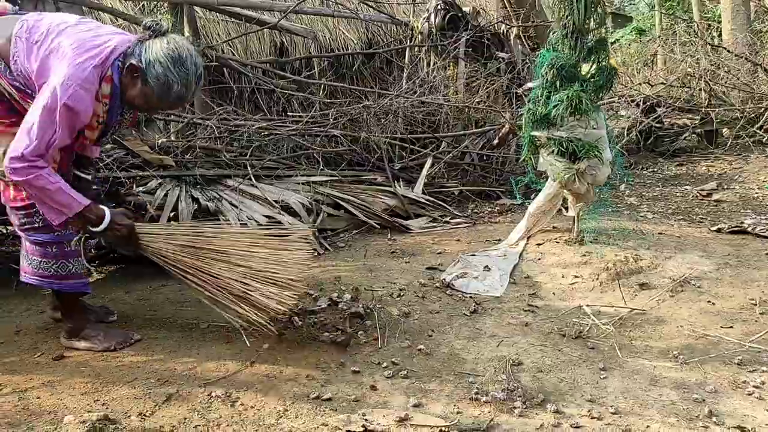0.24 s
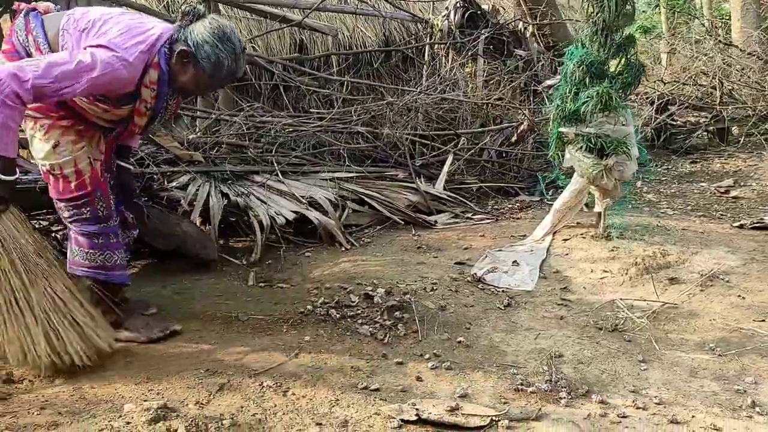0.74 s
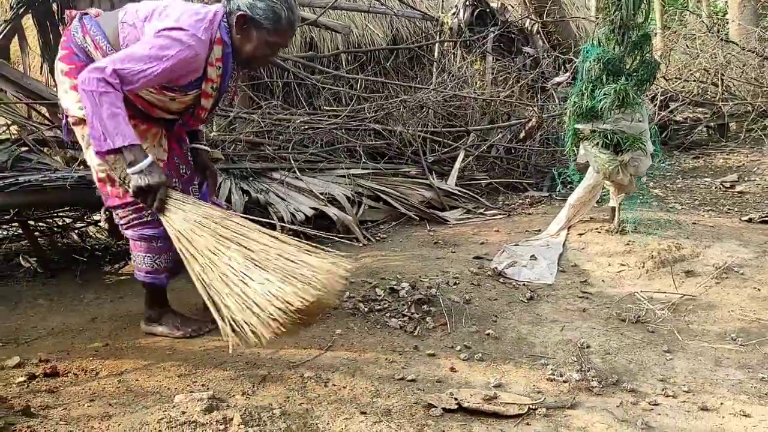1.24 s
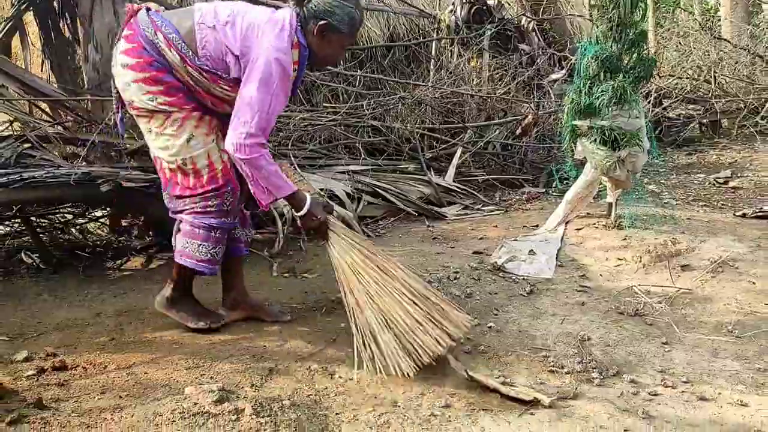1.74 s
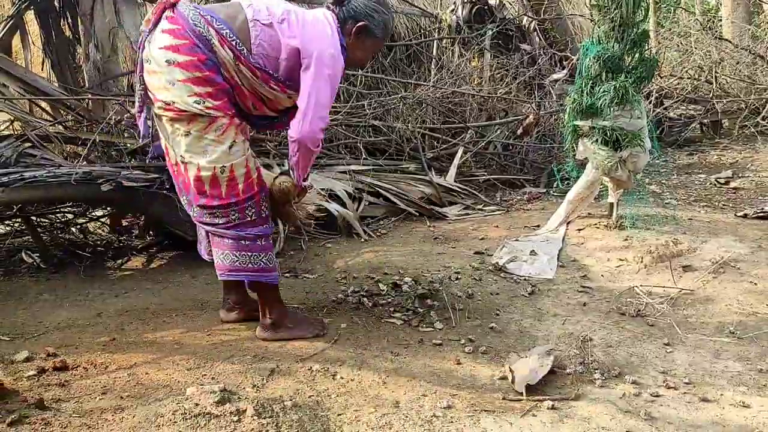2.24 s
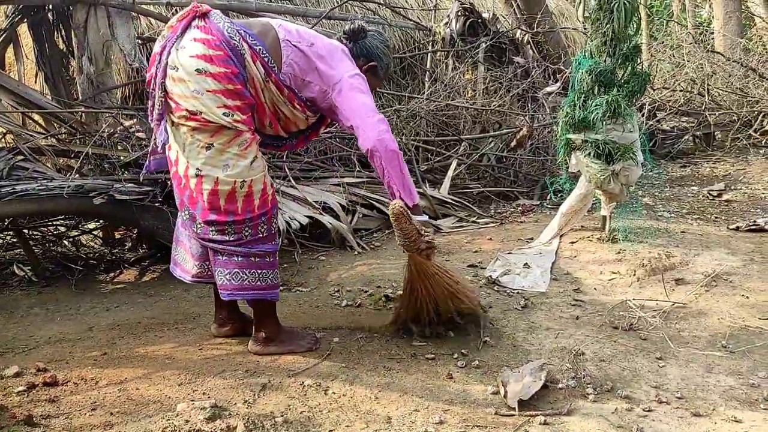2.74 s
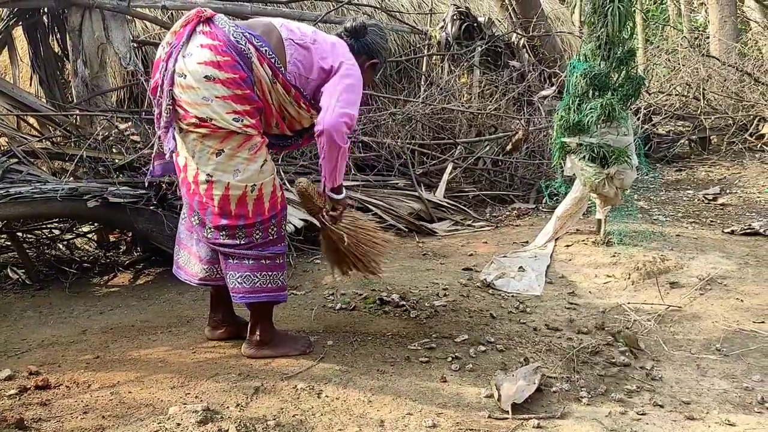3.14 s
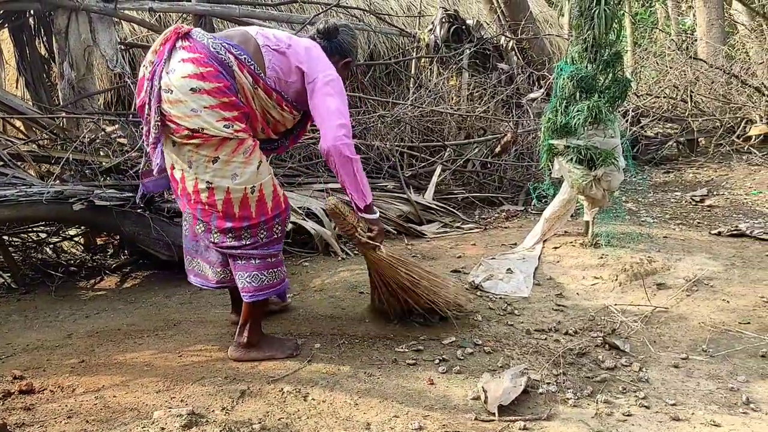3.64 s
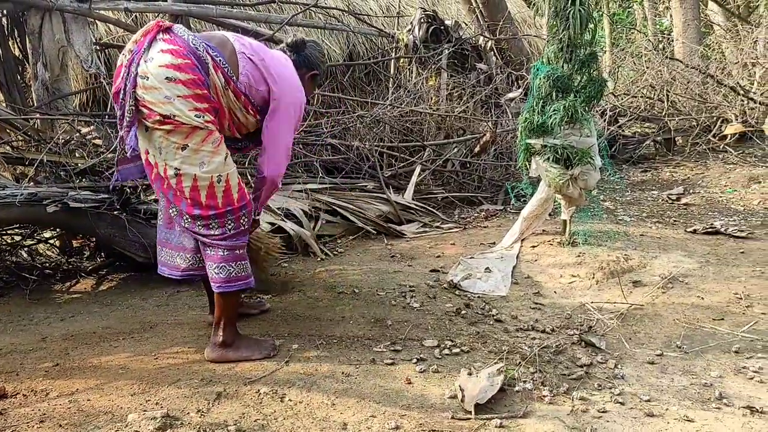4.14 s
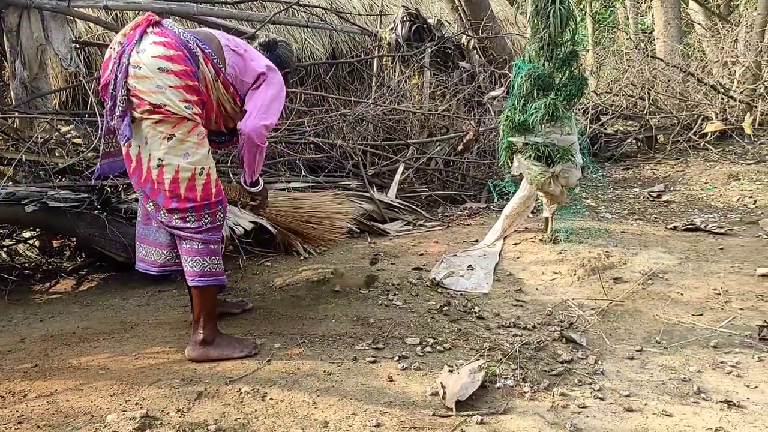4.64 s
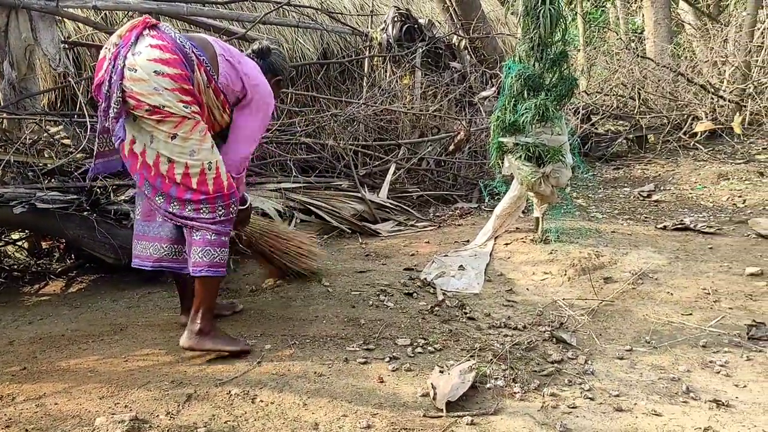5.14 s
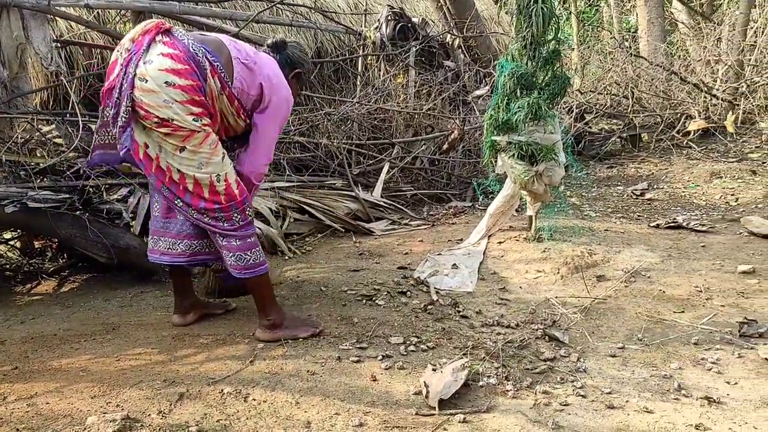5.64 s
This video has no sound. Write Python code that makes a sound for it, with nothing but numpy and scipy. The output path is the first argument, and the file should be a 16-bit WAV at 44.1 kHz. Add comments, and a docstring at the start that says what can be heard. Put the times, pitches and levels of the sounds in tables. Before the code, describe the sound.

Crisp, gritty broom sweeps on earth, with snapping straws and faint bird calls, overlapped by hoarse fluttering rooster crows halfway through.

```python
"""A stiff straw broom scrapes bare dirt in short strokes, a few metres from two microphone ports: coloured random clicks.
Pebbles and snapping straws are decaying noise bursts; a dry husk knocks as a low damped ring under a puff.
Two roosters crow over each other, as fluttering sums of partials; a far hen and a small bird are wavering tones.
Scattered echoes follow, over a yard of shaped noise: a steady low rumble and hiss that drifts in patches."""
import sys
import numpy as np
from scipy import signal
from scipy.fft import rfft, irfft
from scipy.io import wavfile
from scipy.ndimage import uniform_filter1d

SR = 44100
rng = np.random.default_rng(int(sys.argv[2]) if len(sys.argv) > 2 else 0)


def waveform_to_disk(signal):
    """Save audio, clipped to [-1, 1], as 16-bit WAV at the path in sys.argv[1]."""
    frames = np.transpose(np.atleast_2d(signal))
    scaled = np.clip(frames, -1, 1) * 32767
    samples = np.round(scaled).astype(np.int16)
    wavfile.write(sys.argv[1], SR, samples)


def natural_amplitude(level_db):
    """Convert a level in decibels to a linear amplitude factor, elementwise."""
    exponent = np.asarray(level_db, float) / 20
    return 10 ** exponent


N = 260005

# left_right_db is the level of the left port over the right throughout
# spectral density of the yard air, relative: hz, density_db
YARD_SPECTRUM = [(12, -8), (20, 10), (113, -3.5), (551, -11), (770, -15), (1590, -16), (2280, -17.5),
                 (3870, -17), (4840, -20), (7150, -19), (8450, -7), (9190, -13), (10600, -42), (14300, -64),
                 (15600, -98)]
YARD_DB = -63.5  # rms of the mean of both ports
# likeness of the yard air at the two ports: hz, correlation (-1 to 1)
YARD_LIKENESS = [(60, 0.37), (240, 0.08), (950, 0.16), (3770, 0.04), (15000, -0.27)]
# one far call a row: start_s, length_s, first_pitch_hz, last_pitch_hz, level_db
FAR_CALLS = [(1.197, 0.066, 2360, 2120, -60.5), (2.23, 0.2, 1144, 1085, -66.5),
             (2.38, 0.093, 1090, 1200, -62.5), (2.5, 0.06, 1270, 1200, -66), (3.07, 0.071, 1186, 1139, -52),
             (3.19, 0.068, 1264, 1150, -57.5), (3.56, .05, 1230, 1170, -57),
             (3.64, 0.058, 1200, 1150, -51.5), (4.5, 0.16, 1144, 1017, -53)]
FAR_OCTAVE_DB, FAR_OCTAVE_TOP_HZ = 1, 3200  # octave against fundamental; it dies away above this
# one syllable an entry: (third_over_second_partial_db, flutter (0-1), left_right_db),
# then its contour in rows: time_s, pitch_hz, fundamental_db, second_partial_db
CROW_SYLLABLES = [((-22, 0.39, 3), [(3.41, 595, -68, -59), (3.444, 682, -46, -53.5), (3.464, 747, -46, -56),
                  (3.512, 733, -47, -58), (3.55, 763, -75, -58)]), ((-21, 0.47, 3.8),
                  [(3.7, 680, -41.5, -45), (3.728, 896, -42.5, -55), (3.766, 914, -45, -53.5),
                  (3.792, 792, -39, -58), (3.82, 890, -67, -73)]), ((-7.5, 0.11, 3.2),
                  [(3.89, 684, -54, -46), (3.916, 696, -41, -55.5), (3.97, 710, -40, -62),
                  (3.986, 680, -45, -60), (4.0, 640, -79.5, -55)]), ((5.2, .3, 3.4),
                  [(3.99, 654, -62, -47.5), (4.005, 643, -58, -56.5), (4.015, 694, -45.5, -62),
                  (4.056, 711, -42.5, -69), (4.118, 747, -39.5, -58.5), (4.125, 714, -44, -76)]),
                  ((-13, 0.47, 0.65), [(4.12, 794, -48, -59), (4.146, 829, -40, -57.5),
                  (4.21, 824, -43.5, -58.5), (4.234, 859, -42, -54.5), (4.288, 775, -42, -63),
                  (4.34, 783, -62, -71)]), ((-1.5, 0.43, 0), [(4.16, 744, -61, -75), (4.184, 708, -41, -65),
                  (4.2, 708, -50, -66.5), (4.322, 692, -43.5, -52), (4.34, 670, -75, -64)]),
                  ((12.4, 0.16, 1.5), [(4.58, 658, -51, -66), (4.608, 640, -61, -60),
                  (4.638, 652, -54, -63.5), (4.72, 632, -66, -67)]), ((-13.5, 0.094, 2),
                  [(4.69, 673, -69, -46), (4.714, 680, -48.5, -56), (4.808, 672, -49.5, -52),
                  (4.896, 667.5, -54.5, -49), (5.066, 653, -53, -52.5), (5.17, 646, -45, -62)]),
                  ((2, 0.01, -1.1), [(5.17, 647, -47.5, -62), (5.272, 627, -49, -55),
                  (5.322, 612, -49.5, -67), (5.33, 605, -63, -60)]), ((-27.5, 0.01, -8),
                  [(5.32, 624, -68.5, -50), (5.34, 596, -63, -52), (5.39, 569, -73, -57)]),
                  ((-13, 0.39, -0.5), [(5.38, 600, -53, -70), (5.392, 631, -49, -58),
                  (5.454, 633, -46, -58), (5.48, 704, -56, -57.5)]), ((-10, 0.66, 2),
                  [(5.37, 829, -66, -74), (5.4, 850, -54, -71), (5.45, 849, -55, -68),
                  (5.49, 797, -59, -66)])]
# added to left_right_db for partials 1, 2, 3, so that higher ones favour the left: left_right_db
PARTIAL_LEFT_DB = [-3.5, 4, 11.5]
FLUTTER_HZ, CROW_LAG_MS = 59.3, 0.28  # mean flutter rate; delay of the left port
HALF_PER_FLUTTER = .2  # half-pitch lines grow with flutter
OVERTONE_BREAKUP_DB = 8  # how far flutter breaks up the higher partials
# pebbles and straws that snap: start_s, peak_db, left_right_db, rattle_t60_s
TICKS = [(.3282, -29.5, 2, .04), (.407, -41, 2, .012), (.5706, -39.5, -1, .012), (1.719, -28, -2, .008),
         (1.8494, -27, -3, .008), (1.9065, -28, -3, .008), (1.991, -33, -3, .006), (2.049, -34, -1, .02),
         (2.3055, -40, 2, .01), (2.403, -47, -3, .012), (3.0194, -33, -2, .012), (3.893, -36, -3, .015),
         (4.7655, -34, -3, .016), (5.3547, -34, -3, .02), (5.4542, -28.5, 0, .015), (5.5837, -46, -3, .01)]
# a husk knocks the ground: start_s, ring_start_db, settled_pitch_hz, ring_t60_s
KNOCKS = [(1.729, -42.5, 213, 0.063), (2.108, -45, 240, 0.035), (.625, -52, 800, .02)]
# colour of scraping with the treble peak of the microphone, relative: hz, density_db
SCRAPE_SPECTRUM = [(70, -81), (120, -28.5), (250, -26.5), (700, -18.5), (1200, -14), (2200, -9.5),
                   (3700, -11), (5000, -7), (7200, 2.5), (8100, 4.5), (8800, 2), (9500, -9.5), (10800, -14),
                   (15600, -12.5)]
# one push a row: most_pressure_s, rise_s, straw_tips_db, fall_db_per_s, grit_over_tips_db, drag_over_tips_db
STROKES = [(.01, .02, -65, 30, -1, -6), (0.0403, .0015, -33, 60, -8.5, -24),
           (.2, 0.024, -53.5, 68, -1, -11), (.33, .004, -45.5, 205, -4, -26),
           (.42, 0.016, -60, 57, -6, -14), (.58, .02, -60, 73, -29, -16),
           (0.708, 0.014, -36.5, 75, -12.5, -24.5), (0.737, 0.025, -32.5, 151, -10.5, -25.5),
           (.87, 0.019, -46.5, 83, -8, -21), (1.2, .1, -60.5, 27, -13.5, -15),
           (1.452, 0.071, -56.5, 200, -31, -19), (1.61, 0.023, -33.5, 57, -13, -27),
           (1.779, 0.091, -34.5, 115, -10.5, -25), (1.83, 0.086, -44, 137, -2.5, -15),
           (2.0, 0.017, -53, 62, -3, -13.5), (2.12, .04, -59, 85, -3, -16),
           (2.235, 0.025, -53.5, 262, -3, -14), (2.31, .01, -61.5, 292, 4.5, -15),
           (2.42, 0.022, -59.5, 100, -4, -14), (2.47, .06, -55.5, 80, -3.5, -12.5),
           (2.535, 0.022, -39.5, 47, -12, -35), (2.568, 0.033, -38.5, 83, -9.5, -27.5),
           (2.77, 0.11, -32.5, 63, -8.5, -23.5), (2.84, 0.12, -38.5, 84, -3, -18.5),
           (2.98, 0.044, -43, 53, -5.5, -17), (3.11, 0.15, -47.5, 120, -6, -14),
           (3.25, 0.046, -52.5, 140, -2.5, -30), (3.44, 0.057, -56, 60, 1, -11.5),
           (3.49, 0.032, -41, 28, -10.5, -18.5), (3.612, 0.08, -34, 49, -8.5, -27),
           (3.76, 0.24, -43.5, 92, -2.5, -16), (3.9, .012, -49.5, 100, -3, -9.5),
           (4.16, 0.18, -62, 87, 4.5, -5), (4.307, 0.036, -39, 51, -5.5, -15),
           (4.42, 0.063, -43.5, 48.5, -23, -28), (4.532, 0.11, -36.5, 110, -10.5, -19),
           (4.768, 0.029, -49, 166, -2, -11.5), (4.93, 0.15, -52, 155, -7, -14.5),
           (5.022, 0.024, -29, 66, -8.5, -13), (5.052, 0.051, -30, 123, -10.5, -21),
           (5.13, .04, -42, 70, -4.5, -16), (5.24, 0.11, -43, 80, -14, -28),
           (5.357, 0.0061, -41, 124, -7, -13), (5.46, 0.036, -43, 406, -11, -9.5),
           (5.57, 0.057, -61.5, 57, 3.5, -3.5), (5.755, 0.069, -43.5, 67, -10, -22),
           (5.877, 0.057, -39.5, 59, -12, -26)]
# where the broom is: time_s, left_port_delay_ms, left_right_db
BROOM_PLACE = [(0.101, 0.23, -3), (.75, 0.49, -3), (1.7, 0.11, -2), (2.799, 0.042, -3), (3.598, .25, -2),
               (4.399, .4, -3.5), (5.102, 0.26, -2.5), (5.8, 0.29, -2.5)]
# scrape layers in the order tips, top treble, grit, drag, rumble, snaps:
# low_edge_hz, high_edge_hz, grains_per_s, size_spread_db, delay_spread_ms
SCRAPE_LAYERS = [(5220, 10400, 9000, 1.5, .12), (10300, 19000, 9000, 2.5, .06),
                 (846, 4380, 4000, 0.5, 0.16), (335, 985, 900, 1, 0.32), (132, 349, 600, 1.5, 0.26),
                 (1200, 24000, 60, 4, .1)]
RISE_DB = 14  # gained over the rise time
RUMBLE_PER_DRAG, RUMBLE_DB = 1.584, 2  # a heavier drag reaches deeper
SNAPS_DB, SETTLE_SNAPS_DB = -19, -4  # straws that snap back, against the tips; their change in the trickle
TOP_DB, SETTLE_TOP_DB = -12, -8  # top treble against the tips; the trickle has less of it
# thrown dirt trickles on after each push: level against the push, its fall, extra grit and drag
SETTLE_DB, SETTLE_DB_PER_S, SETTLE_DULL_DB = -31.5, 33.5, 9
# balance of the two ports over frequency: hz, left_right_db
PORT_BALANCE = [(60, 4.5), (330, 7.5), (1200, 3.5), (2700, 2), (4500, 2.5), (6400, -0.5), (7400, -5),
                (8600, 7), (9800, 5.5), (12000, -1.5)]


def evened(x):
    """Normalization: the mean of the two ports is brought to rms 1."""
    return x / np.sqrt(np.mean(np.mean(x, 0) ** 2) + 1e-20)


def read(points, hz):
    """Interpolation of a spectrum on a logarithmic frequency axis."""
    f, value = np.transpose(points)
    return np.interp(np.log(hz + 1), np.log(f + 1), value)


def add(mix, s, sound):
    """Superposition: a two-port sound is summed into the mix at s seconds."""
    part = mix[:, round(s * SR):][:, :sound.shape[1]]
    part += sound[:, :part.shape[1]]


def sides(db):
    """Level difference between ports: half is given to the left, half taken from the right."""
    return natural_amplitude(np.multiply.outer([.5, -.5], db))


def slow(hz):
    """Low-passed noise: a smooth random course of rms 1, with its cutoff at hz."""
    x = signal.lfilter(*signal.butter(2, hz, fs=SR), rng.standard_normal(N))
    return x / x.std()


def causal(db):
    """Minimum phase: the Hilbert transform turns 2049 levels into the most compact causal response."""
    log_gain = np.log(natural_amplitude(np.maximum(db, -100)))
    circle = np.concatenate([log_gain, log_gain[-2:0:-1]])
    return np.fft.ifft(np.exp(np.conj(signal.hilbert(circle)))).real[:2048]


def yard(patchy_db=2.5, swell_db=2, swell_hz=3):
    """Spectral shaping of partly correlated noise: even low rumble, and hiss that swells and drifts in patches."""
    frames, hz = N // 256 + 5, np.fft.rfftfreq(1024, 1 / SR)
    a, b, c, d, patches = rng.standard_normal((frames, 513, 5)).T
    patches = uniform_filter1d(uniform_filter1d(patches, 12, 0), 14, 1)
    swell = np.resize(slow(swell_hz)[::256], frames)
    unsteady = (hz / (hz + 800))[:, None]  # the rumble stays even
    likeness = np.clip(read(YARD_LIKENESS, hz), -1, 1)[:, None]
    left = a + 1j * b
    right = likeness * left + np.sqrt(1 - likeness ** 2) * (c + 1j * d)
    drift_db = patchy_db * patches / patches.std() + swell_db * swell
    level = natural_amplitude(read(YARD_SPECTRUM, hz)[:, None] + unsteady * drift_db)
    air = signal.istft(np.array([left, right]) * level, nperseg=1024, noverlap=768)[1]
    return natural_amplitude(YARD_DB) * evened(air[:, :N])


def echoes(x, t60=0.39):
    """Scattering from fences and trees: decaying sparse taps of random sign, others for each port."""
    taps = np.zeros((2, SR // 2))
    at = np.arange(300, SR // 2 - 22, 22)  # samples
    at = at + rng.integers(0, 22, (2, len(at)))
    decay = natural_amplitude(-60 * at / SR / t60)
    np.put_along_axis(taps, at, rng.choice([-1., 1.], at.shape) * decay, 1)
    return signal.fftconvolve(x, taps / np.linalg.norm(taps[0]), axes=1)[:, :N]


def far_call(start, length, first_hz, last_hz, db, jitter=.035):
    """Frequency modulation: a gliding, wavering tone with an octave that is weaker for high calls."""
    t = np.arange(0, length, 1 / SR)
    wobble = uniform_filter1d(rng.standard_normal(len(t)), 225) * 15
    glide_hz = first_hz + (last_hz - first_hz) * t / length
    turns = np.cumsum(glide_hz * (1 + jitter * first_hz / 1200 * wobble)) / SR
    turns = turns + np.array([[0], [.15]])  # phase between the ports
    gusts = natural_amplitude(1.6 * slow(33)[:len(t)])  # moving air breaks the tone up on its way
    octave = natural_amplitude(FAR_OCTAVE_DB) / (1 + (2 * first_hz / FAR_OCTAVE_TOP_HZ) ** 8)
    tone = natural_amplitude(db) * (np.cos(2 * np.pi * turns) + octave * np.cos(4 * np.pi * turns))
    return start, np.sqrt(2) * tone * gusts * signal.windows.tukey(len(t), .6)


def crow(colour, rows, jitter=.002):
    """Modulation by a second throat vibration: it flutters three partials; uneven cycles add half-pitch lines."""
    third_db, flutter, pan_db = colour
    s, *columns = np.transpose(rows)
    t = np.arange(s[0], s[-1], 1 / SR)
    hz, db1, db2 = (np.interp(t, s, c) for c in columns)
    db3 = db2 + third_db
    wobble = uniform_filter1d(rng.standard_normal((3, len(t))), 300, 1) * np.sqrt(300)
    beat = 2 * np.pi * np.cumsum(FLUTTER_HZ * (1 + 0.21 * wobble[1])) / SR
    turns = np.cumsum(hz * (1 + (jitter + 0.014 * flutter) * wobble[0])) / SR
    turns = turns + 0.16 * flutter * np.sin(beat + 1.2)
    lag = hz * CROW_LAG_MS / 1000  # turns by which the left port is late
    turns = np.array([turns - lag, turns])
    half = HALF_PER_FLUTTER * flutter * natural_amplitude(6 * slow(20)[:len(t)])
    half_lines = np.cos(3 * np.pi * turns) + .5 * np.cos(5 * np.pi * turns)  # 1.5 and 2.5 times the pitch
    voice = half * natural_amplitude(np.maximum(db1, db3)) * half_lines
    for k, db, left_db in zip((1, 2, 3), (db1, db2, db3), PARTIAL_LEFT_DB):
        ports = sides(pan_db + left_db)[:, None]
        left, right = ports
        centre = abs(left * np.exp(-2j * np.pi * k * lag) + right) / 2  # levels are those of the mean of both ports
        breakup_db = (k > 1) * OVERTONE_BREAKUP_DB * flutter * slow(13.5)[:len(t)]
        voice = voice + natural_amplitude(db + breakup_db) / centre * ports * np.cos(2 * np.pi * k * turns)
    uneven = 1 + flutter * (np.cos(beat) + 0.35 * wobble[2])
    fade = signal.windows.tukey(len(t), min(1, 0.0086 / (t[-1] - t[0])))
    return s[0], np.sqrt(2) * voice * uneven * fade


def scrape_colour(lo_hz, hi_hz):
    """Band-pass filtering: the scrape spectrum between two soft edges."""
    hz = np.fft.rfftfreq(4096, 1 / SR) + 1
    edges = 1 / (1 + (lo_hz / hz) ** 8) / (1 + (hz / hi_hz) ** 8)
    return causal(read(SCRAPE_SPECTRUM, hz) + 10 * np.log10(edges))


def debris(grit_db=4):
    """Impact and damping: ticks are sharp bursts that rattle out, knocks a low damped ring under a puff."""
    out, t = np.zeros((2, N)), np.arange(SR // 8) / SR
    colour = scrape_colour(4700, 15700) + natural_amplitude(grit_db) * scrape_colour(900, 4700)
    for s, db, pan_db, t60 in TICKS:
        burst = rng.standard_normal((2, len(t))) * natural_amplitude(-60 * t / max(t60, .003))
        burst = signal.oaconvolve(burst, colour[None])[:, :len(t)]
        add(out, s, natural_amplitude(db) * sides(pan_db)[:, None] * burst / abs(burst.mean(0)).max())
    for s, db, hz, t60 in KNOCKS:
        sag = 1 + .5 * np.exp(-t / 0.00083)  # the pitch drops as the husk settles
        ring = np.sin(2 * np.pi * hz * np.cumsum(sag) / SR) * natural_amplitude(-60 * t / t60)
        puff = signal.lfilter(*signal.butter(2, 900, fs=SR), rng.standard_normal(len(t)))
        knock = ring + puff * natural_amplitude(9 - 60 * t / .025)
        add(out, s, natural_amplitude(db) * np.array([knock, knock]))
    return out


def stroke_levels():
    """Addition of powers: each push rises, falls and leaves a trickle; gives the gain of each scrape layer."""
    t = np.arange(0, N + 32, 32) / SR
    s, rise_s, db, fall, grit_db, drag_db = np.transpose(STROKES)[:, :, None]
    after = np.maximum(t - s, 0)
    onset_db = db - RISE_DB * (np.maximum(s - t, 0) / np.maximum(rise_s, .001)) ** 1.66
    # doubled decibels make powers
    push = natural_amplitude(2 * np.maximum(-300, onset_db - fall * after))
    trickle = natural_amplitude(2 * (onset_db + SETTLE_DB - SETTLE_DB_PER_S * after))
    # each layer against the tips, and its change in the trickle, dB
    shares = ((0, 0), (TOP_DB, SETTLE_TOP_DB), (grit_db, SETTLE_DULL_DB), (drag_db, SETTLE_DULL_DB),
              (RUMBLE_PER_DRAG * drag_db + RUMBLE_DB, 0), (SNAPS_DB, SETTLE_SNAPS_DB))
    levels = []
    for share_db, settle_db in shares:
        power = np.sum(natural_amplitude(2 * share_db) * (push + natural_amplitude(2 * settle_db) * trickle), 0)
        levels.append(np.interp(np.arange(N) / SR, t, np.sqrt(power)))
    return levels


def broom(clump_db=1, clump_hz=45, own_db=1.17, own_hz=70):
    """Stick-slip friction: every straw that slips is a click, with its own delay between the ports."""
    t = np.arange(N) / SR
    at, *place = np.transpose(BROOM_PLACE)
    lag_ms, pan_db = (np.interp(t, at, c) for c in place)
    bunch = slow(clump_hz)  # grains of all layers swell together
    out = np.zeros((2, N))
    for (lo_hz, hi_hz, per_s, spread_db, spread_ms), level in zip(SCRAPE_LAYERS, stroke_levels()):
        size = natural_amplitude(spread_db * np.minimum(rng.exponential(1, N), 5)) * rng.choice([-1, 1], N)
        size *= natural_amplitude(clump_db * bunch + own_db * slow(own_hz))
        size *= rng.random(N) < per_s / SR  # only some samples hold a grain
        late = np.arange(N) + (lag_ms + spread_ms * rng.standard_normal(N)) * SR / 1000
        left = np.bincount(np.clip(np.round(late).astype(int), 0, N - 1), size, N)
        clicks, colour = np.array([left, size]), scrape_colour(lo_hz, hi_hz)[None]
        unit = np.sqrt(np.mean(np.mean(signal.oaconvolve(clicks, colour), 0) ** 2))
        stroke = level * sides(pan_db)
        out += signal.oaconvolve(clicks * stroke, colour)[:, :N] / unit
    return out


def scene():
    """Direct and scattered sound: far calls echo most, broom and debris less, roosters least, over the yard."""
    roosters, far = np.zeros((2, 2, N))
    for syllable in CROW_SYLLABLES:
        add(roosters, *crow(*syllable))
    for row in FAR_CALLS:
        add(far, *far_call(*row))
    near = broom() + debris()
    wet = natural_amplitude(-12) * near + natural_amplitude(-17) * roosters + natural_amplitude(-7) * far
    return near + roosters + far + echoes(wet) + yard()


def top_cut(x):
    """Nothing passes above the cut-off."""
    return signal.sosfilt(signal.butter(12, 15720, fs=SR, output="sos"), x)


def record(dry):
    """Linear filtering: the two ports differ in bass and in the place of their treble peak."""
    ports = sides(read(PORT_BALANCE, np.fft.rfftfreq(N, 1 / SR)))
    mix = irfft(rfft(dry, axis=1) * ports, N, axis=1)
    return top_cut(mix)


dry = scene()
out = record(dry)
waveform_to_disk(out)
```